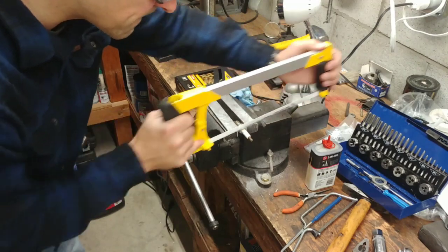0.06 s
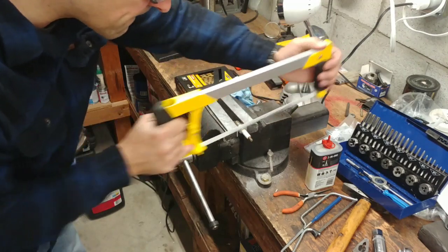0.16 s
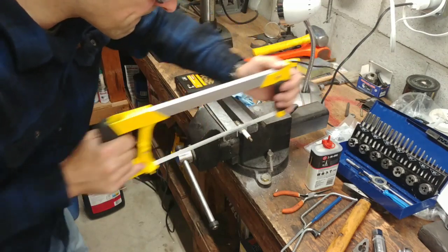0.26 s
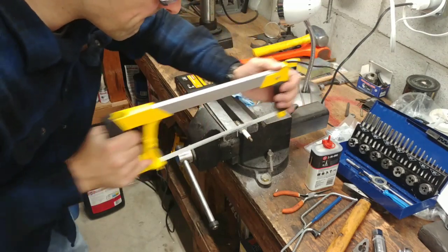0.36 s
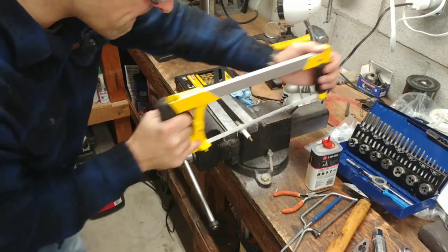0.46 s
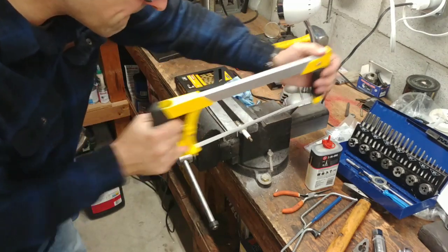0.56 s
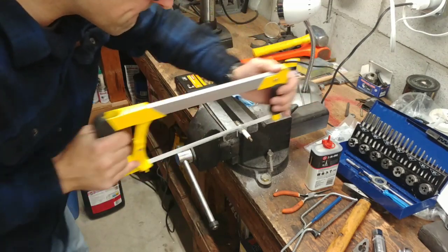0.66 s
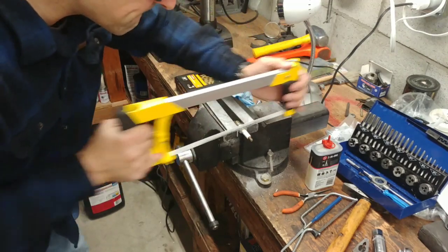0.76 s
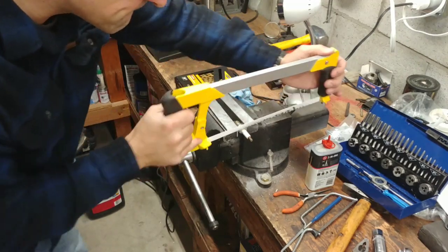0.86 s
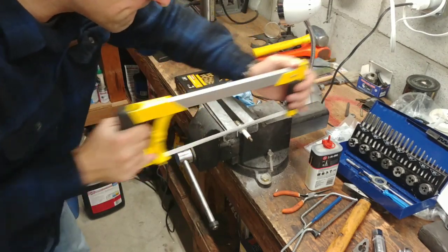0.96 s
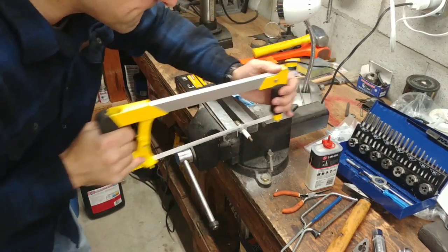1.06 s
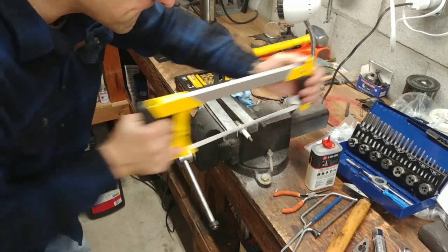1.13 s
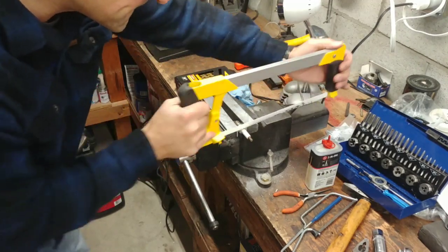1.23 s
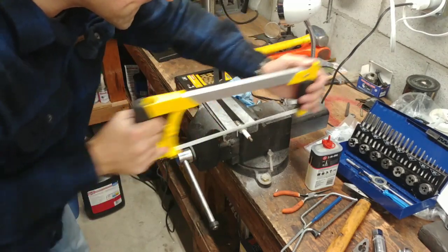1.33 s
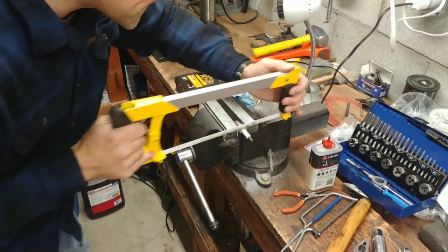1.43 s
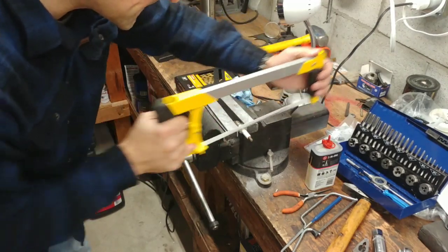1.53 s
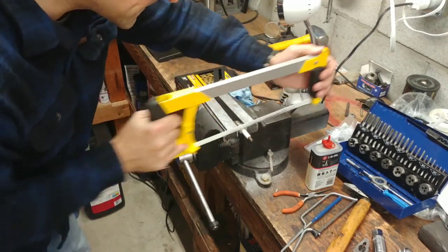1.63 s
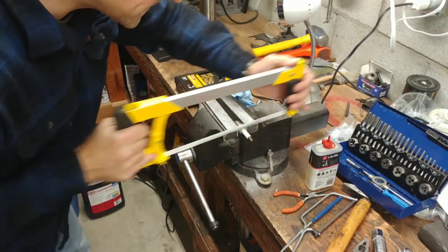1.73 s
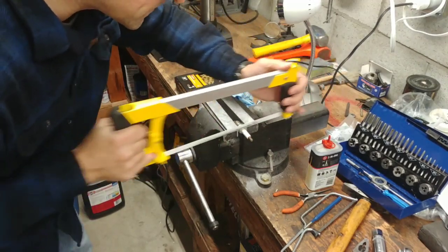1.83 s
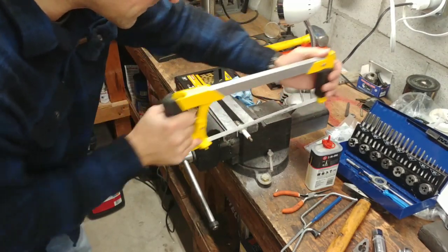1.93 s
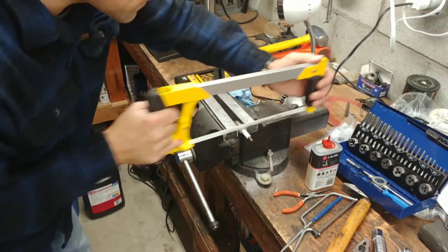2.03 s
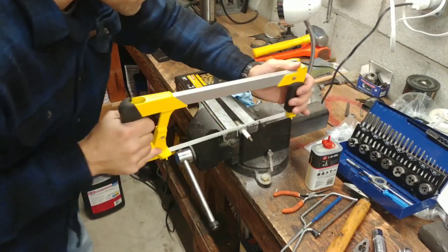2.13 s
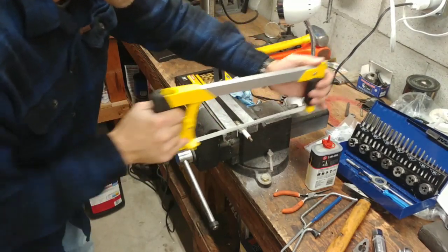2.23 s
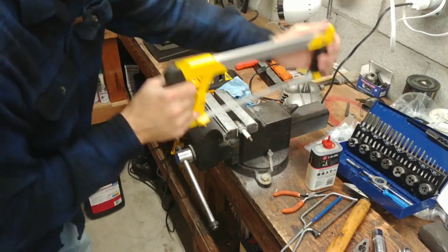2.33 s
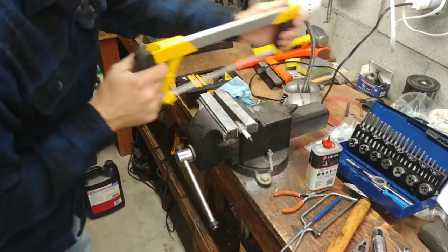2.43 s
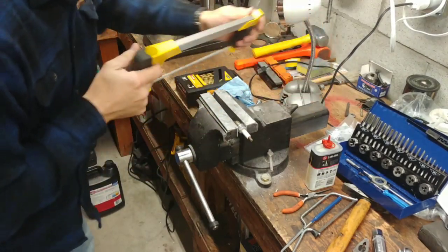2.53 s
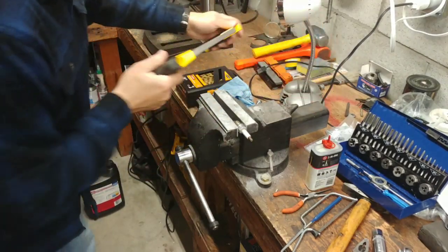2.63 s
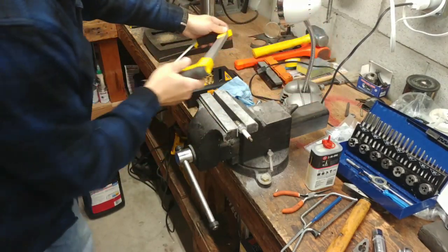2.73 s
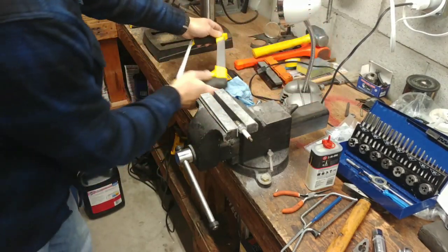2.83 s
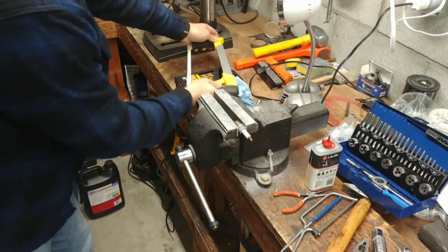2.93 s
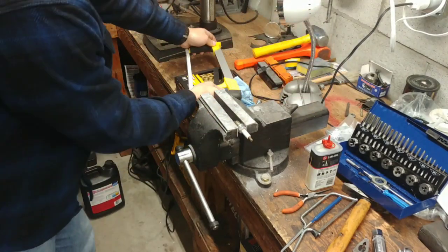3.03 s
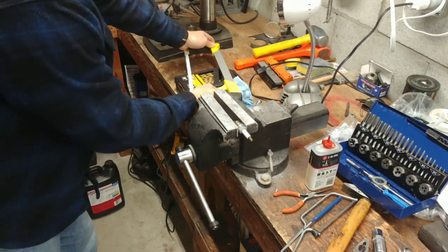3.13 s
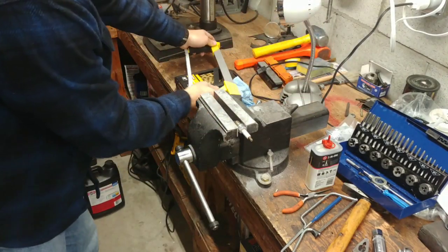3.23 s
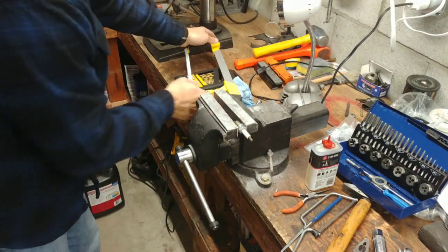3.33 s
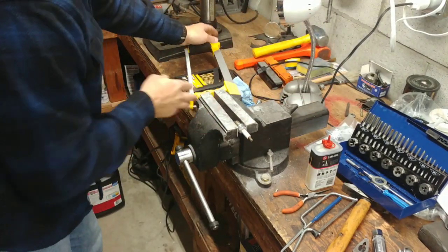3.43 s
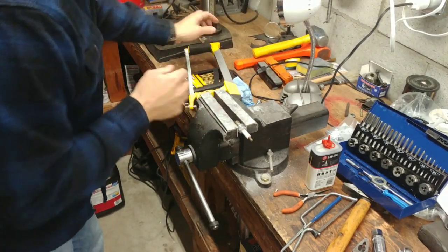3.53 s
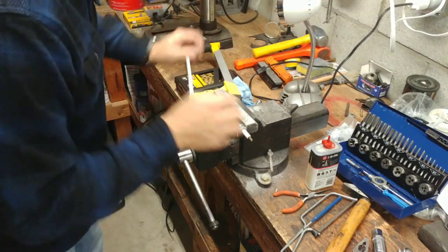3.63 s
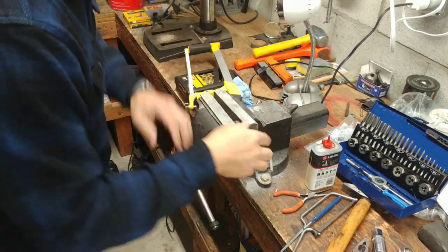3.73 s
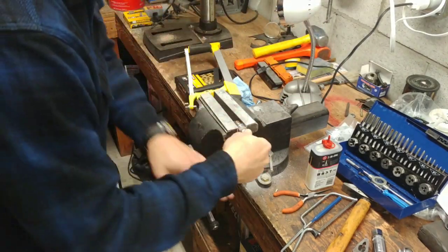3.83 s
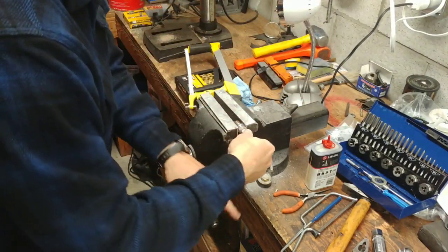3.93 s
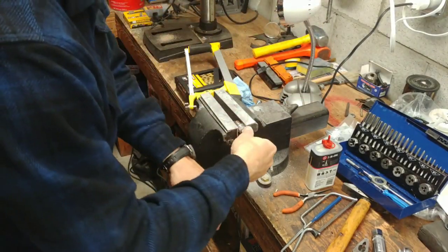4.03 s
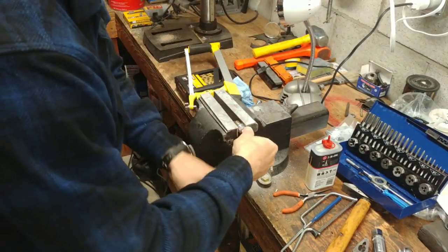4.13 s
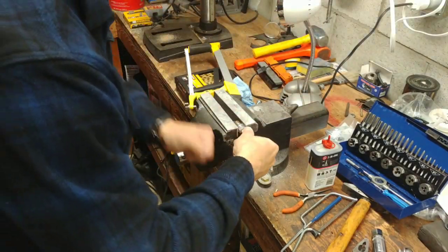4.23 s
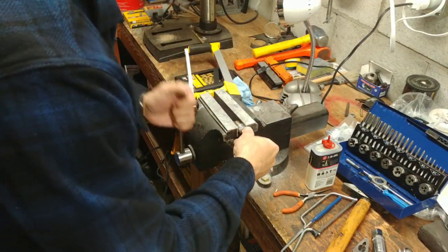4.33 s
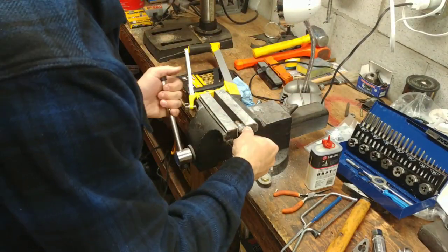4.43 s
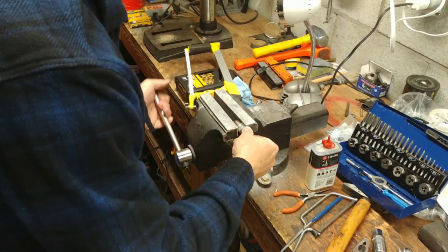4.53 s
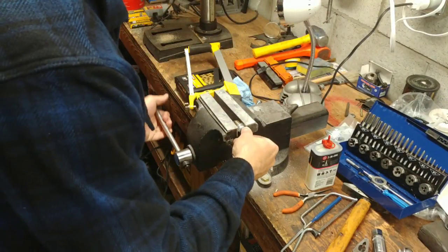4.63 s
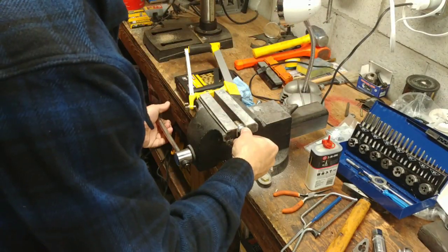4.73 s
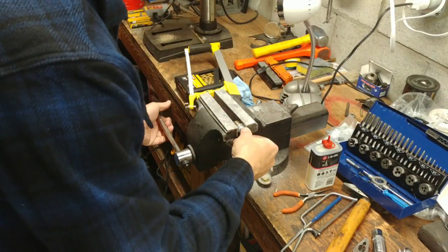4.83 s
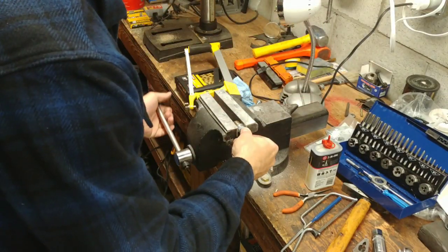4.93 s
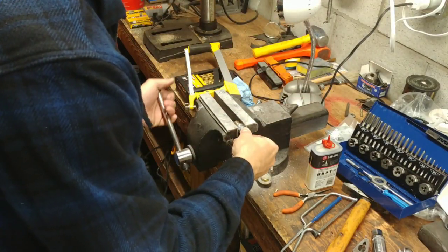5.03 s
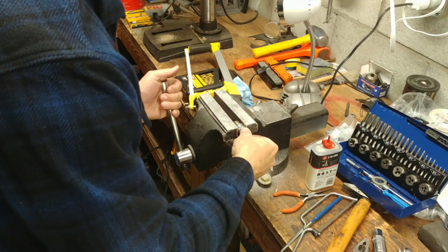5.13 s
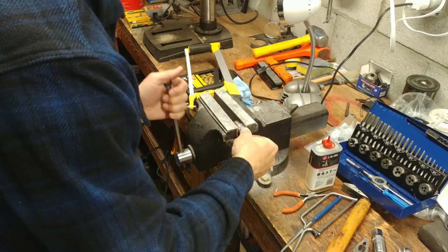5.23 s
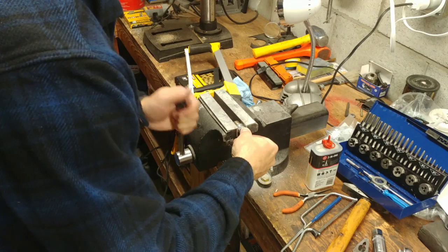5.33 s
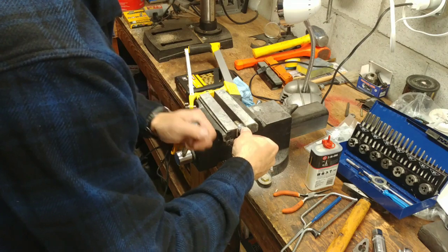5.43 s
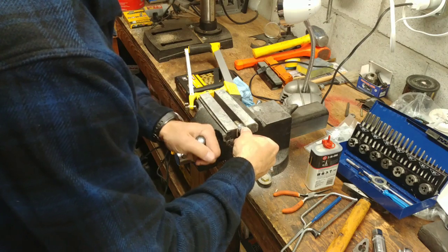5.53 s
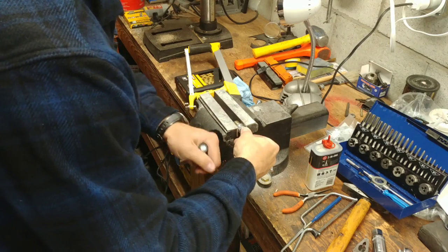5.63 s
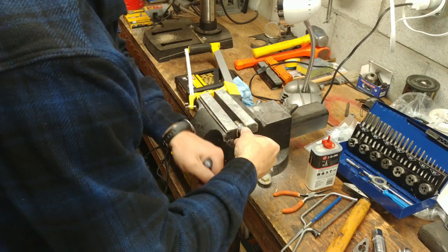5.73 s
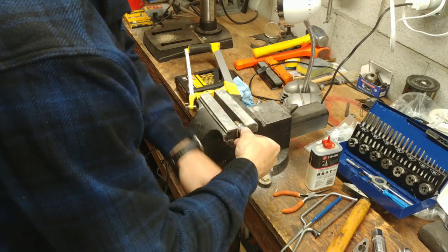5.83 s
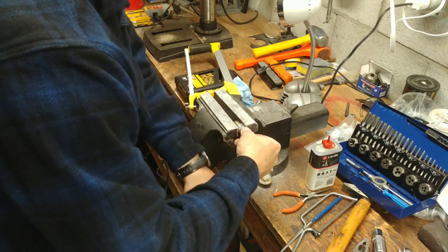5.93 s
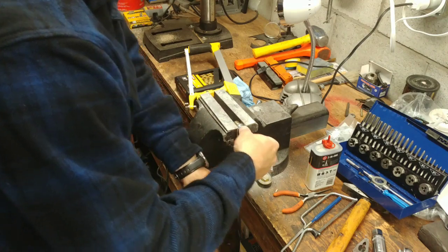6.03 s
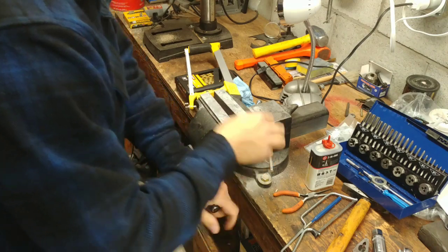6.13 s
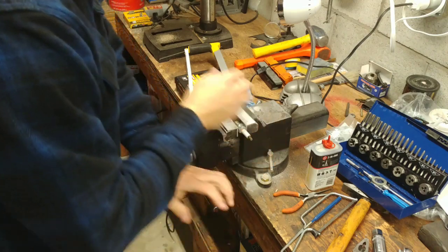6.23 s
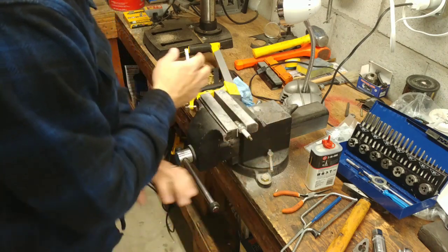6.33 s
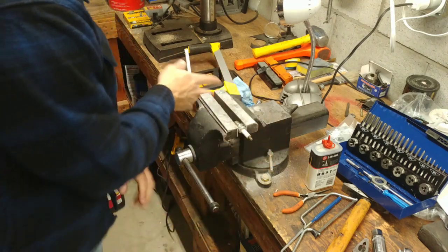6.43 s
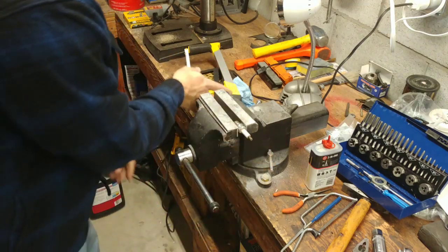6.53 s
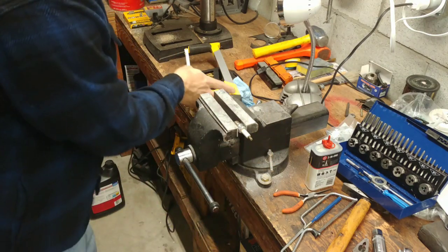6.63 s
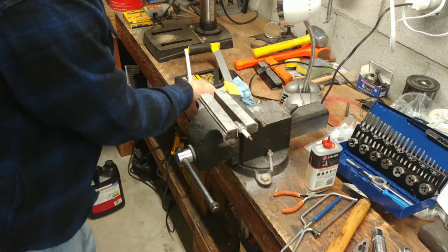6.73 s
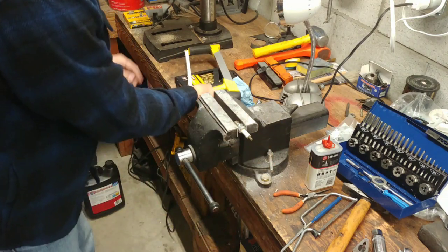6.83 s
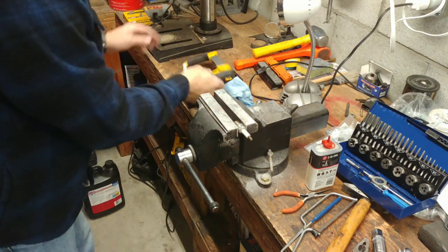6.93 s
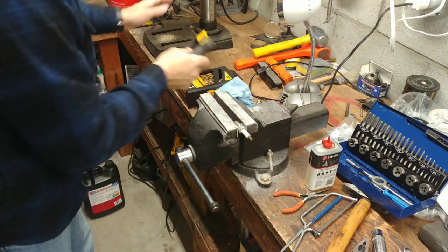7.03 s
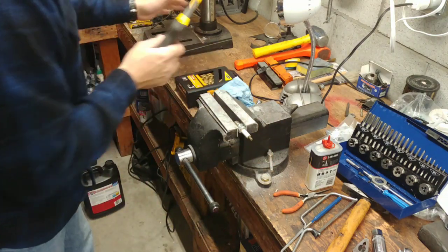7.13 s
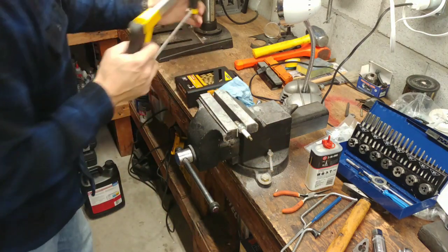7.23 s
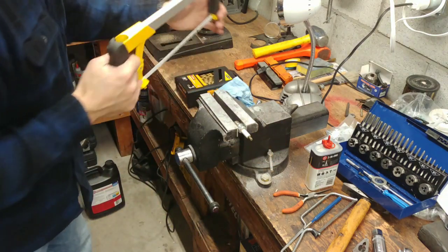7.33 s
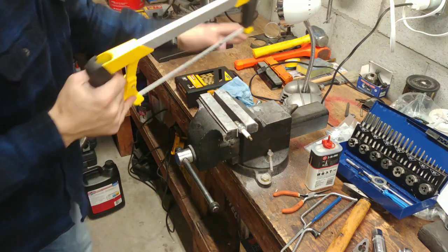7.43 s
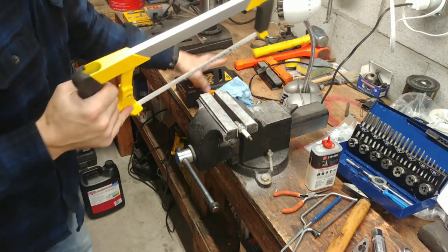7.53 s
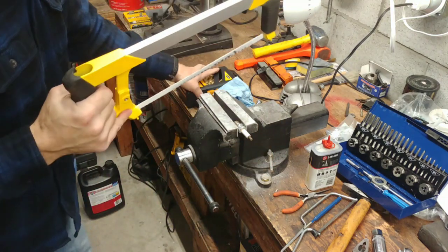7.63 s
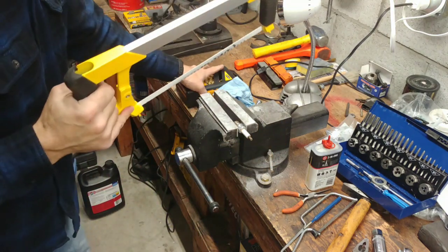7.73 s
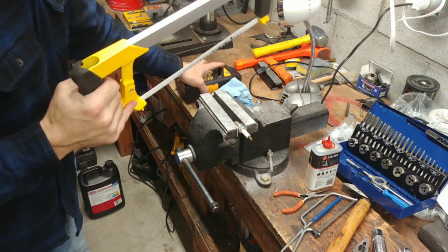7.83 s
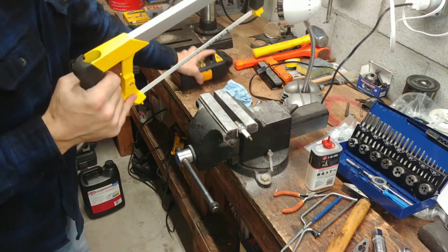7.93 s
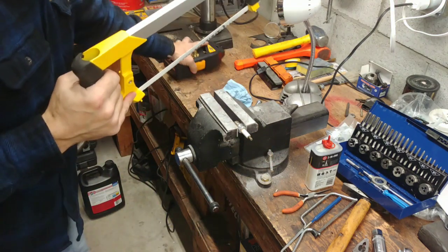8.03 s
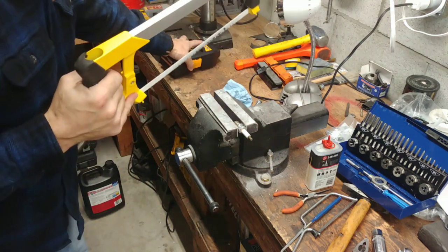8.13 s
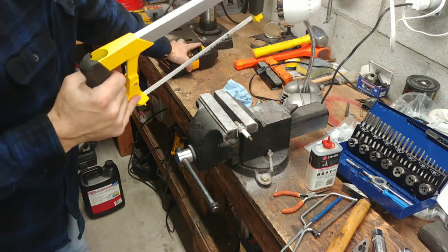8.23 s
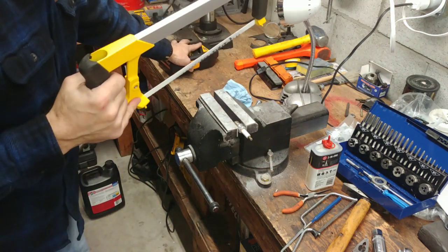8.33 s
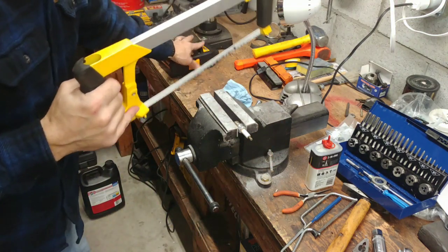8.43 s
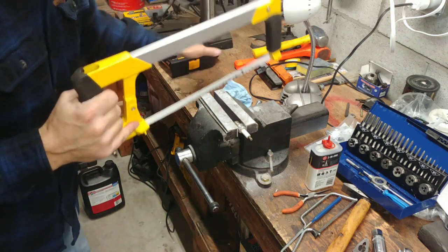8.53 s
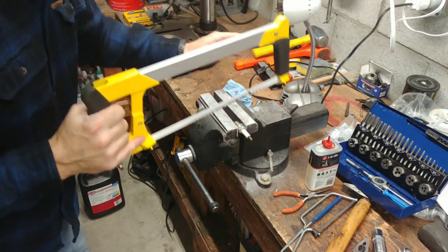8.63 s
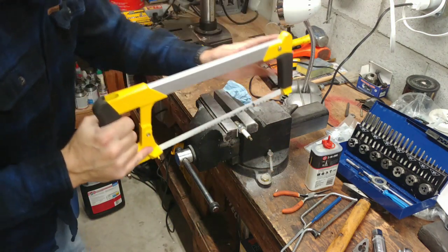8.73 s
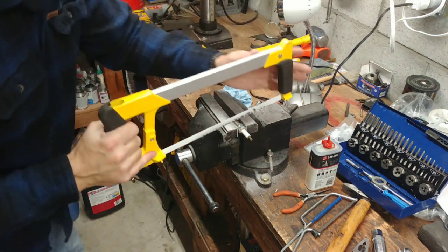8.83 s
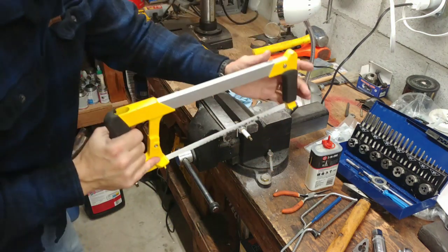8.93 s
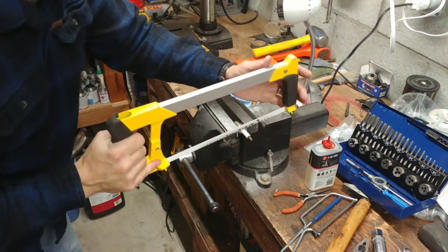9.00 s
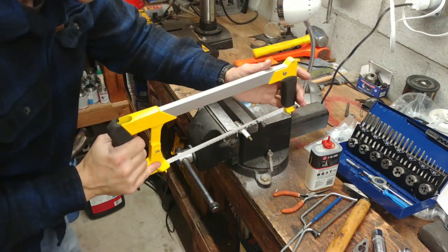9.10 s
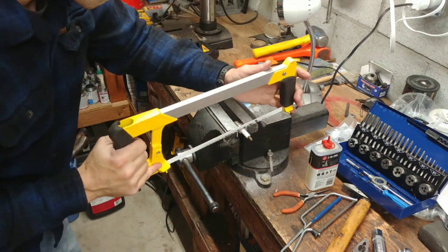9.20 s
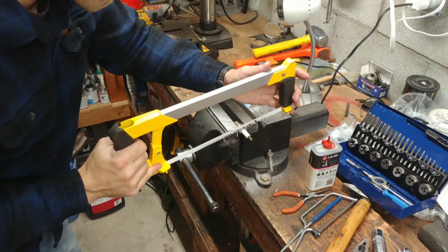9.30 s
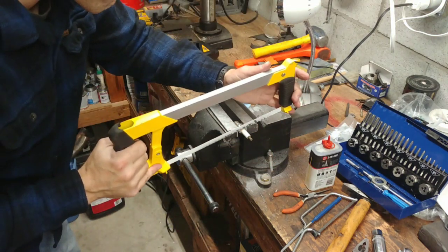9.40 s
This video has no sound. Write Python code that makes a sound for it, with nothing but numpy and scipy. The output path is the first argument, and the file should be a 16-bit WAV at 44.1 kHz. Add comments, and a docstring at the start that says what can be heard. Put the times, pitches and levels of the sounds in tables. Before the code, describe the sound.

Close, bright rasping of a hacksaw through metal, about six strokes a second, with hissing teeth, ringing blade and rumbling bench. It fades out, and the saw is set down with knocks and a short scrape. Loose metal clunks follow as the vise is slackened and tightened. Near the end comes one heavy, clustered thump on wood, then quiet hum in a small cluttered workshop.

```python
"""Small workshop, faint hum: a hacksaw makes thirteen quick strokes through a steel part in a bench vise.
Uneven tooth bites drive rasp and hiss, the ringing blade and frame, and the bench rumble; snags chirp.
Then the saw is laid down, the vise slackened and tightened, and a tool set down hard on the bench:
each knock is a dead blow, decaying modes and a noise clatter, split into bands."""
import sys
import numpy as np
from scipy import signal
from scipy.fft import rfft, irfft, next_fast_len
from scipy.io import wavfile
from scipy.ndimage import uniform_filter1d

SR = 44100
rng = np.random.default_rng(int(sys.argv[2]) if len(sys.argv) > 2 else 0)


def master_out(mix):
    """Clip the mix to full scale and print it as 16-bit PCM to the path in sys.argv[1]."""
    frames = np.transpose(np.atleast_2d(mix))
    ceiling = np.clip(frames, -1, 1)
    pcm = np.round(ceiling * 32767).astype(np.int16)
    wavfile.write(sys.argv[1], SR, pcm)


N = 417186


def from_db(db):
    """Decibels to gain."""
    return np.exp(np.asarray(db) * (np.log(10) / 20))


def rms_one(x):
    """Scale to rms 1."""
    return x / np.sqrt(np.mean(x ** 2) + 1e-20)


def at_hz(points, hz):
    """Read a spectrum on a log-frequency axis."""
    known_hz, value = np.transpose(points)
    return np.interp(np.log(np.maximum(hz, 1)), np.log(known_hz), value)


def add(out, start_s, sound):
    """Mix a sound in at a time."""
    start = round(start_s * SR)
    out[:, start:start + sound.shape[-1]] += sound[..., :N - start]


def colour(x, points, size=4096):
    """Causal (minimum-phase) filter with the given spectrum."""
    gain = from_db(at_hz(points, np.fft.rfftfreq(size, 1 / SR)))
    cepstrum = irfft(np.log(gain))
    cepstrum[1:size // 2] *= 2
    cepstrum[size // 2 + 1:] = 0
    impulse = irfft(np.exp(rfft(cepstrum)))
    return signal.oaconvolve(x, impulse[None], axes=-1)[:, :x.shape[-1]]


def band(x, low_hz, high_hz):
    """Butterworth band-pass."""
    edges_hz = [low_hz, min(high_hz, SR / 2 - 100)]
    return signal.sosfilt(signal.butter(2, edges_hz, "band", fs=SR, output="sos"), x)


# left-right correlation of diffuse sound: f/Hz, correlation
CHANNEL_CORRELATION = [(100, 0.98), (300, 0.92), (700, 0.57), (1300, .25), (3000, 0), (6000, 0.041)]


def stereo_noise(size):
    """White noise, alike in both channels in the bass and almost unrelated in the treble."""
    mid, side = rfft(rng.standard_normal((2, size)))
    alike = np.clip(at_hz(CHANNEL_CORRELATION, np.fft.rfftfreq(size, 1 / SR)), -1, 1)
    spectra = np.sqrt(1 + alike) * mid + np.sqrt(1 - alike) * side * [[1], [-1]]
    return rms_one(irfft(spectra, size))


def wander(t, per_s):
    """Random curve, spread about 1: normal draws per_s times a second, joined by straight lines."""
    return np.interp(t * per_s, np.arange(4096), rng.standard_normal(4096))


def resonate(x, modes):
    """Parallel two-pole resonances of (f/Hz, width/Hz, level/dB)."""
    out = 0
    for hz, width_hz, db in modes:
        r = np.exp(-np.pi * width_hz / SR)
        poles = [1, -2 * r * np.cos(2 * np.pi * hz / SR), r * r]
        out = out + from_db(db) * (1 - r * r) / 2 * signal.lfilter([1, 0, -1], poles, x)
    return out


def pan(x, left_db):
    """Lean a sound to the left by a level difference."""
    return x * from_db([[left_db / 2], [-left_db / 2]])


def workshop(x, wet_db, t60_s):
    """Dense reflections from the cluttered walls: decaying noise after a 4 ms gap."""
    t = np.arange(SR // 2) / SR
    echoes = stereo_noise(len(t)) * from_db(-60 * t / t60_s) * (t > .004)
    echoes /= np.sqrt(np.sum(echoes ** 2) / 2)
    return x + from_db(wet_db) * signal.oaconvolve(x, echoes, axes=-1)[:, :x.shape[-1]]


# hum tones, before panning: f/Hz, level/dB rms
HUM_TONES = [(73.8, -65), (61.5, -70.5), (154, -81), (214, -87.5)]
# room noise spectrum: f/Hz, level/dB per Hz (relative)
AIR_SPECTRUM = [(20, -12.5), (32, -9), (50, 5), (70, 5.5), (100, 3), (140, 0.5), (220, -3), (450, -3.5),
                (750, -2), (1300, -11.5), (2500, -14), (5500, -17), (7000, -21.5), (10500, -25),
                (14500, -20.5)]


def background(air_db=-67):
    """Slightly unsteady hum tones, two of them close and beating, over soft room noise."""
    t = np.arange(N) / SR
    hum = sum(np.sqrt(2) * from_db(db) * np.sin(2 * np.pi * hz * t + .15 * wander(t, 2.3))
              for hz, db in HUM_TONES)
    air = rms_one(colour(stereo_noise(next_fast_len(N, True)), AIR_SPECTRUM))[:, :N]
    return pan(hum + from_db(air_db) * air, left_db=4.5)


PIVOT_HZ = 563   # hardness tilts the spectrum about this pitch


def contact_db(hz, hardness):
    """A hard contact favours the treble, a soft one the bass; hardness in dB per octave."""
    return hardness * np.log2(hz / PIVOT_HZ)


# clatter spectrum at hardness 0: f/Hz, level/dB (relative)
CLATTER_SPECTRUM = [(60, -3.5), (150, 0.5), (350, 2.5), (650, -2), (1000, 0), (1500, 5), (3500, -11.5),
                    (6000, -15.5), (9000, -25.5), (15000, -30)]


def knocks(table, modes, bands, scatter_t60_s, ring_db, room_db, build_s,
           blow_hz, blow_t60_s, blow_db, bass_lag_s, bass_linger=0.248):
    """A blow gives a dead knock and fast clatter, rings modes of chance strength and wakes the room."""
    out, t = np.zeros((2, N)), np.arange(SR * 2 // 5) / SR
    hz, mode_db, t60_s = np.transpose(modes)[:, :, None]
    decay = from_db(mode_db - 60 * t / t60_s)
    sine, cosine = decay * np.sin(2 * np.pi * hz * t), decay * np.cos(2 * np.pi * hz * t)
    for knock_s, knock_db, hardness in table:
        # gentle touches load slowly, more rub than knock
        softness = np.clip((-40 - knock_db) / 5, 0, 5)
        build = 1 - np.exp(-t / (build_s * (1 + softness)))

        strength = from_db(contact_db(hz.T, hardness) + rng.normal(0, 2.6, len(modes)))
        # the higher the mode, the less its phases in the two channels are related
        phase = rng.uniform(0, 2 * np.pi, len(modes)) + rng.normal(0, 1, (2, len(modes))) * hz.T / 1500
        ring = (strength * np.cos(phase)) @ sine + (strength * np.sin(phase)) @ cosine
        ring = from_db(ring_db) * ring

        pitch_hz = blow_hz * np.exp(rng.normal(0, 0.039))   # no two blows land on the same spot
        blow = from_db(blow_db - 60 * t / blow_t60_s) * np.sin(2 * np.pi * pitch_hz * t)

        spectrum = [(f, db + contact_db(f, hardness)) for f, db in CLATTER_SPECTRUM]
        clatter = rms_one(colour(stereo_noise(len(t)), spectrum))

        for low_hz, high_hz, room_t60_s, band_db in bands:
            centre_hz = np.sqrt(low_hz * high_hz)
            # below the pivot the heavy bench answers late and rings on
            octaves_below = max(np.log2(PIVOT_HZ / centre_hz), 0)
            clatter_t60_s = scatter_t60_s * (1 + 0.069 * softness + bass_linger * octaves_below)
            dying = from_db(-60 * t / clatter_t60_s) + from_db(room_db - 60 * t / room_t60_s)
            sound = band(build * (blow + ring + clatter * dying), low_hz, high_hz)
            gain = from_db(knock_db + band_db + contact_db(centre_hz, hardness))
            onset_std = np.std(sound[:, :SR // 40])   # level set on the first 25 ms
            add(out, knock_s + bass_lag_s * octaves_below, gain * sound / onset_std)
    return out


# clicks as the saw is let go and the vise is handled: t/s, level/dB, hardness/(dB/octave)
CLICKS = [(3.524, -38, -.3), (3.532, -41, 1), (5.748, -72, 5.5), (6.434, -77, 7)]
# saw modes, for clicks and rocks: f/Hz, level/dB, t60/s
SAW_KNOCK_MODES = [(198, -17, 0.11), (656, -4, .1), (1066, 12, 0.12), (2640, -2, .1), (3100, -3, .14),
                   (3630, -7, 0.12), (4070, -3, 0.037)]
# thump, body, crack, ting: low f/Hz, high f/Hz, room t60/s, level/dB
SAW_CLICK_BANDS = [(70, 230, 0.31, -9.5), (337, 1250, 0.23, -0.5), (1339, 6600, 0.22, -3),
                   (5230, 15000, 0.23, -21)]


def saw_clicks():
    """Light contacts: near-instant loading and a very short clatter."""
    return knocks(CLICKS, SAW_KNOCK_MODES, SAW_CLICK_BANDS, scatter_t60_s=0.01, ring_db=-16.5,
                  room_db=-14.5, build_s=.0001, blow_hz=1077, blow_t60_s=0.019, blow_db=4.5, bass_lag_s=.001)


# drag noise spectrum: f/Hz, level/dB per Hz (relative)
SLIDE_SPECTRUM = [(200, -7), (1000, -2.5), (1800, -6), (3200, -1.5), (4200, -9), (6000, -21), (15000, -23)]


def slide(level_db=-43, attack_s=0.016, hold_s=0.059, sag_db_per_s=110, release_t60_s=.12):
    """The saw frame drags over the wood in fine, uneven slips: starts, slows, stops."""
    t = np.arange(SR // 4) / SR
    sliding_s = np.clip(t - attack_s, 0, hold_s)
    stopped_s = np.maximum(t - attack_s - hold_s, 0)
    db = level_db - sag_db_per_s * sliding_s - 60 * stopped_s / release_t60_s
    slips = np.minimum(t / attack_s, 1) * from_db(db + 1.0 * wander(t, 610))
    return slips * rms_one(colour(stereo_noise(len(t)), SLIDE_SPECTRUM))


# frame rocking on the bench: t/s, level/dB, hardness/(dB/octave)
ROCKS = [(3.272, -38.5, 0), (3.313, -35, -2.5), (3.354, -44, -1)]
# thump, body, crack, ting: low f/Hz, high f/Hz, room t60/s, level/dB
FRAME_ROCK_BANDS = [(69.5, 240, .39, -14), (444, 860, 0.3, 0), (1110, 2300, 0.22, -5.5),
                    (2150, 4400, .22, -20.5)]


def frame_rocks():
    """The saw frame rocks on the bench as it settles, sounding the saw modes."""
    return knocks(ROCKS, SAW_KNOCK_MODES, FRAME_ROCK_BANDS, scatter_t60_s=0.12, ring_db=-15, room_db=-9.5,
                  build_s=0.002, blow_hz=581, blow_t60_s=0.042, blow_db=5, bass_lag_s=0.00091)


# free handle drops against its stop: t/s, level/dB, hardness/(dB/octave)
DROPS = [(6.33, -55, -8), (6.434, -44.5, 1.5)]
# free handle: f/Hz, level/dB, t60/s
FREE_HANDLE_MODES = [(176.7, -2.5, 0.74), (208.1, -9.5, 1.9), (340, -3.5, 0.24), (495, -3.5, 0.3),
                     (610, -8, 0.23), (2680, -22, 0.32), (3420, -20, 0.24), (4640, -18, .2),
                     (6070, -9.5, 0.13), (8280, -11, .14), (9000, -12, 0.13)]
# held in the hand it only pings: t/s, level/dB, hardness/(dB/octave)
PINGS = [(4.478, -36, 0), (5.218, -63, 0)]
# held handle: f/Hz, level/dB, t60/s
HELD_HANDLE_MODES = [(1790, -4.5, .09), (2890, 1.5, 0.12)]


def handle_ring(table, modes):
    """Each touch sets the bending modes of the steel handle ringing."""
    out, t = np.zeros((2, N)), np.arange(SR) / SR
    for touch_s, touch_db, hardness in table:
        for hz, mode_db, t60_s in modes:
            db = touch_db + mode_db + contact_db(hz, hardness)
            add(out, touch_s, from_db(db - 60 * t / t60_s) * np.sin(2 * np.pi * hz * t))
    return out


def with_rebounds(table, delay_s=0.04, loss_db=17, softer_db_per_octave=2.2):
    """The loose handle rebounds once after each knock, weaker and duller."""
    rebounds = [(s + delay_s, db - loss_db, hardness - softer_db_per_octave) for s, db, hardness in table]
    return list(table) + rebounds


# hands and sliding handle on the vise: t/s, level/dB before panning, hardness/(dB/octave)
VISE_CONTACTS = [(3.976, -48.5, 3), (3.996, -40, -1.5), (4.312, -49.5, -0.5), (4.347, -26, 1),
                 (4.418, -35, -1), (4.476, -26.5, .9), (4.682, -50.5, -0.2), (5.129, -47, -0.5),
                 (5.213, -42, -.5), (5.245, -39.5, -0.4), (5.32, -47.5, -2), (5.379, -45, -3),
                 (6.284, -57, -4), (6.435, -52, -3.5)]
# vise: f/Hz, level/dB, t60/s
VISE_RING_MODES = [(123, -6.5, 0.23), (182, -19, 0.36), (340.3, 0, 0.16), (422, 4, 0.18), (525, -9, 0.37),
                   (574.5, -2, 0.18), (667, -2.5, 0.17), (743, -15, 0.1), (792, -3.5, 0.21),
                   (910, -5, 0.29), (1090, -6.5, 0.23), (1384, -8, .17), (2830, -8, 0.23),
                   (4000, -29, 0.092), (4500, -18, .1), (5900, -12, .16)]
# thump, body, crack, ting: low f/Hz, high f/Hz, room t60/s, level/dB
VISE_KNOCK_BANDS = [(51, 220, 0.38, -3), (308, 1015, .33, 0.5), (1300, 6470, .3, -12),
                    (5300, 20400, .28, -25)]


def vise_knocks():
    """Handling knocks and their rebounds ring the vise, leaning left."""
    vise = knocks(with_rebounds(VISE_CONTACTS), VISE_RING_MODES, VISE_KNOCK_BANDS,
                  scatter_t60_s=0.15, ring_db=-8.5, room_db=-6.5, build_s=0.0014,
                  blow_hz=810, blow_t60_s=0.0077, blow_db=3, bass_lag_s=0.00299)
    return pan(vise, left_db=1.0)


# things set down on the wooden bench: t/s, level/dB, hardness/(dB/octave)
SET_DOWNS = [(3.121, -26, .6), (3.131, -28.5, -1), (6.859, -61, 3.5), (7.189, -61, 2.5), (7.867, -55, 0.5),
             (8.251, -21, 1.3), (8.28, -15.5, 1.67), (8.308, -25.5, 1.5), (9.319, -64, 2.5)]
# bench: f/Hz, level/dB, t60/s
BENCH_RING_MODES = [(107.36, -3.5, .5), (203.4, -4.5, 0.29), (470, -6, 0.088), (498, -6.5, 0.27),
                    (544, -2, 0.33), (549, 3.5, .2), (591, -15, 0.18), (657, -6.5, 0.23), (822, 4, .2),
                    (950, -28, .19), (1060, 2, 0.19), (1470, -34, 0.13), (1900, -13.5, 0.27),
                    (2440, -16.5, 0.15), (3850, -12.5, .13)]
# thump, body, crack, ting: low f/Hz, high f/Hz, room t60/s, level/dB
BENCH_KNOCK_BANDS = [(65, 215, .42, -8.5), (470, 980, 0.34, -0.5), (1240, 6200, 0.34, -10.5),
                     (5450, 13700, 0.34, -26.5)]


def bench_knocks():
    """Things set down excite the modes of the wooden bench."""
    return knocks(SET_DOWNS, BENCH_RING_MODES, BENCH_KNOCK_BANDS, scatter_t60_s=0.13, ring_db=-17.5,
                  room_db=-5, build_s=0.0018, blow_hz=598, blow_t60_s=0.034, blow_db=4.5, bass_lag_s=.006)


# blade snags, frame judders or blade chirps: t/s of swell end, f/Hz, level/dB (relative)
SNAG_TONES = [(.060, 843, -9), (.087, 836, -6.5), (.116, 852, -19.5), (.462, 830, -12), (.512, 803, -15),
              (.66, 1400, -13), (1.085, 3340, -22), (1.245, 3580, -20), (1.272, 867, -9.5),
              (1.289, 691.6, -10.5), (1.365, 4880, -19), (1.757, 4820, -18.5), (1.79, 3780, -17.5)]


def snags(swell_s=.015, swell_power=.3, ring_t60_s=0.11, level_db=-3.5):
    """A snag swells into a brief unsteady tone, which then rings out."""
    out, t = np.zeros((2, N)), np.arange(SR // 4) / SR
    for peak_s, hz, db in SNAG_TONES:
        length_s = swell_s * (hz / 1000) ** swell_power   # higher chirps take longer to build
        rise = np.sin(np.pi / 2 * t / length_s) ** 2
        fall = from_db(-60 * (t - length_s) / ring_t60_s)
        swell = np.where(t < length_s, rise, fall)
        phase = 2 * np.pi * np.cumsum(hz * (1 + .04 * wander(t, 700))) / SR
        add(out, peak_s - length_s, from_db(db + level_db) * swell * np.sin(phase))
    return out


# strokes, push and pull in turn: start t/s, tooth bite level/dB, frame shake level/dB (both relative)
SAW_STROKES = [(-.025, -34.5, -21.5), (.18, -31.5, -27.5), (.376, -33, -22), (.568, -30.5, -25),
               (.756, -32, -19.5), (.952, -29.5, -23), (1.136, -25, -19), (1.317, -30, -24.5),
               (1.495, -30, -25.5), (1.672, -29, -26), (1.849, -28.5, -30.5), (2.027, -35, -28.5),
               (2.197, -38.5, -37)]
LAST_STROKE_END_S = 2.3105
PUSH_LATE, PULL_LATE = -0.037, .06   # share of a stroke: fastest moment after its middle


def stroke_motion(t, creep=.06):
    """Stroke index, blade speed 0-1 (a mere creep at each turn) and blade position 0-1."""
    turns_s = [row[0] for row in SAW_STROKES] + [LAST_STROKE_END_S]
    progress = np.interp(t, turns_s, np.arange(len(turns_s)))
    stroke = np.minimum(progress.astype(int), len(SAW_STROKES) - 1)
    late = np.where(stroke % 2, PULL_LATE, PUSH_LATE)
    progress = progress - late * np.abs(np.sin(np.pi * progress))
    speed = np.hypot(np.sin(np.pi * progress), creep * (t < LAST_STROKE_END_S))
    return stroke, speed, (1 - np.cos(np.pi * progress)) / 2


def tooth_bites(t, speed, teeth_per_s, jitter, bite_db, chip_db):
    """Each tooth tears a chip: a sharp bite of chance strength that fades by bite_db until the next."""
    passed = np.cumsum(teeth_per_s * speed * np.exp(jitter * wander(t, 300))) / SR
    strength_db = chip_db * rng.standard_normal(8192)[passed.astype(int)]
    bites = from_db(strength_db - bite_db * (passed % 1))
    return bites / np.sqrt(np.average(bites ** 2, weights=speed))


def blade_echo(x, position, near_s, travel_s, share):
    """Bending waves return from the blade's end; the path changes as it slides, so a comb sweeps."""
    now = np.arange(x.shape[-1])
    back = now - (near_s + travel_s * position) * SR
    echo = np.array([np.interp(back, now, side) for side in x])
    return (x + share * echo) / np.hypot(1, share)


# bench under the cut: f/Hz, level/dB per Hz (relative)
RUMBLE_SPECTRUM = [(25, -25.5), (38, -17.5), (52, -1), (66, 4), (92, -9.5), (113, 3), (135, -1),
                   (200, -1.5), (250, -21.5), (450, -12.5), (900, -47)]
# saw frame and clamped steel: f/Hz, width/Hz, level/dB
FRAME_MODES = [(355.6, 13, 3.5), (557, 6.2, -11), (616, 24, -10), (676, 25, -8), (770, 17, -12.5),
               (827.4, 12, 5.5), (858, 18, -2.5), (910, 30, -13.5), (953, 2.8, -8), (1196, 50, -15),
               (1330, 11, -7.5)]
# cut: f/Hz, level/dB per Hz (relative)
RASP_SPECTRUM = [(200, -23.5), (450, -4.5), (1100, 8), (1650, -6.5), (2300, 4), (3000, -1), (3800, 3),
                 (4500, -10), (5500, -11.5), (8000, -38)]
# tensioned blade: f/Hz, width/Hz, level/dB
BLADE_MODES = [(1865, 62, -4), (2390, 130, -12.5), (3440, 13, 3), (3660, 30, -4), (3787, 46, 2.5),
               (4070, 20, -6), (4540, 33, -11.5)]
# chips: f/Hz, level/dB per Hz (relative)
HISS_SPECTRUM = [(2500, -29), (4500, -0.5), (5500, -3.5), (7000, -1.5), (8300, -3), (9300, -2), (12000, -1),
                 (15000, 4)]
# tensioned blade, top modes: f/Hz, width/Hz, level/dB
BLADE_TOP_MODES = [(5790, 20, -2.5), (6020, 90, -9), (6730, 40, -8.5), (7770, 80, -2), (7590, 45, -2.5),
                   (7980, 110, -1), (8500, 58, -8), (8900, 49, -6.5)]


def sawing(sway_db=2.0, patchy_db=6.0):
    """Tooth bites drive the cut, the blade, the frame and the bench; the treble needs the most speed."""
    t = np.arange(SR * 5 // 2) / SR
    stroke, speed, position = stroke_motion(t)
    bites = tooth_bites(t, speed, teeth_per_s=850, jitter=0.23, bite_db=4.5, chip_db=2.0)
    grip = from_db(1.1 * wander(t, 70))   # the hand's pressure is never even
    levels = from_db(np.array(SAW_STROKES)[stroke, 1:].T)
    bite, shake = uniform_filter1d(levels, SR // 50, axis=1)   # 20 ms smoothing
    hiss = bite ** 1.204   # a deeper bite is also brighter

    def ringing(force, modes):
        """Each mode's drive sways at random."""
        return sum(resonate(force * from_db(sway_db * np.tanh(wander(t, 16))), [mode]) for mode in modes)

    def scraping(force, spectrum):
        """Broad scrape whose colour shifts at random."""
        edges_hz = np.geomspace(1000, 10000, 10)
        patches = sum(band(force, low, high) * (from_db(patchy_db * wander(t, 30)) - 1)
                      for low, high in zip(edges_hz, edges_hz[1:]))
        scrape = colour(force + patches, spectrum)
        return blade_echo(scrape, position, near_s=.00045, travel_s=0.00054, share=0.19)

    def driven(body, shape, level, speed_power):
        """One body's answer to the bites, at the stroke's level."""
        force = stereo_noise(len(t)) * bites * grip * level * speed ** speed_power
        return rms_one(body(force, shape)) * np.std(force)

    bench = from_db(-11.5) * driven(colour, RUMBLE_SPECTRUM, shake ** 0.73, speed_power=0.17)
    # the hands damp the frame more when it is driven hard
    frame = from_db(-8.0) * driven(ringing, FRAME_MODES, shake ** 0.7, speed_power=0.77)
    cut = from_db(-0.8) * driven(scraping, RASP_SPECTRUM, bite, speed_power=1.5)
    blade = from_db(-1.5) * driven(ringing, BLADE_MODES, bite, speed_power=1.4)
    chips = from_db(12.0) * driven(scraping, HISS_SPECTRUM, hiss, speed_power=1.9)
    zing = from_db(0.53) * driven(ringing, BLADE_TOP_MODES, hiss, speed_power=2.2)
    saw = frame + cut + pan(blade, left_db=-3.5) + chips + pan(zing, left_db=-7)
    return workshop(bench, wet_db=-8.5, t60_s=0.15) + workshop(saw, wet_db=-6.5, t60_s=0.22)


# left and right channel colour, uneven treble, deep notch near 10 kHz: f/Hz, level/dB
LEFT_COLOUR = [(400, 0), (720, 7.5), (1300, -2.5), (2400, -2), (6200, 0), (7200, -11.5), (8600, -5.5),
               (9400, -14), (10400, -22.5), (11700, -13), (15000, -0.5)]
RIGHT_COLOUR = [(400, -3), (720, 0), (1300, -0.5), (2400, 3.5), (6200, 4), (7200, 0.5), (8100, 7),
                (9100, 2.5), (9600, -5.5), (10100, -37.5), (11000, -35), (11600, -13), (15000, -14.5)]


def colour_channels(sound, left_lag_s=.0001):
    """Each channel gets its own uneven treble with a notch near 10 kHz; the left is a little later."""
    left = np.interp(np.arange(N) - left_lag_s * SR, np.arange(N), sound[0])
    return np.vstack([colour(left[None], LEFT_COLOUR), colour(sound[1:], RIGHT_COLOUR)])


def scene():
    """Sawing and handling get the channel colour; the background is added after it."""
    sound = saw_clicks() + frame_rocks()
    add(sound, 3.513, slide())
    sound += handle_ring(DROPS, FREE_HANDLE_MODES) + handle_ring(PINGS, HELD_HANDLE_MODES)
    sound += vise_knocks() + bench_knocks() + snags()
    add(sound, 0, sawing())
    return colour_channels(sound) + background()


def record(dry):
    """Steep elliptic low-pass at 15.8 kHz."""
    return signal.sosfilt(signal.ellip(10, .1, 80, 15800, fs=SR, output="sos"), dry)


dry = scene()
out = record(dry)
master_out(out)
```